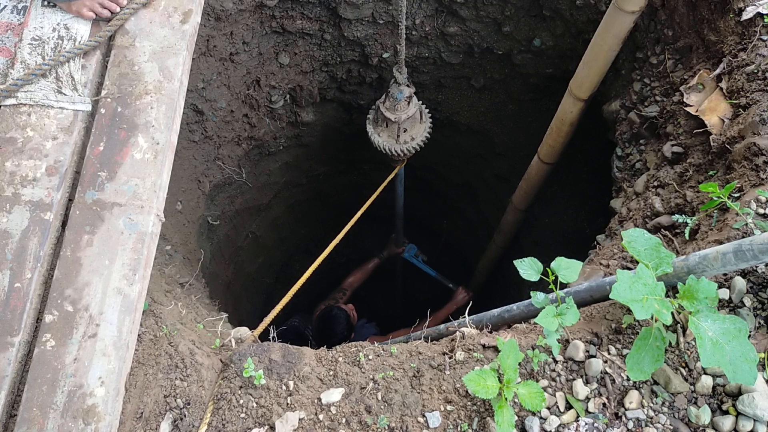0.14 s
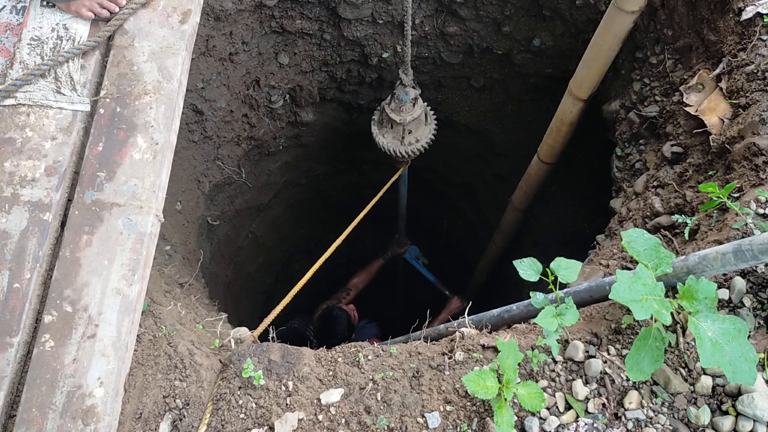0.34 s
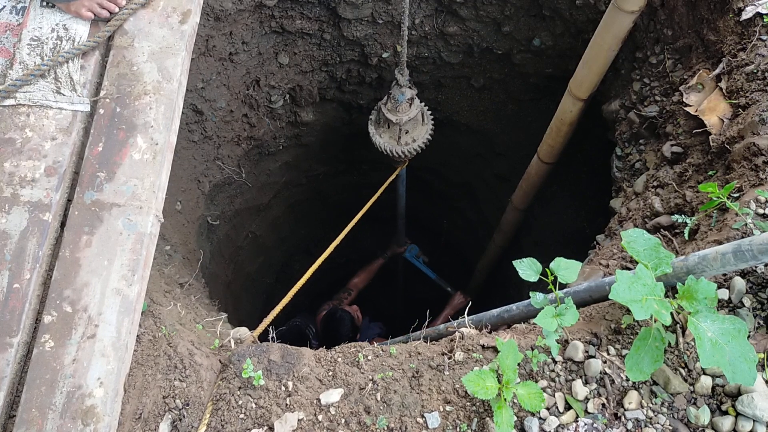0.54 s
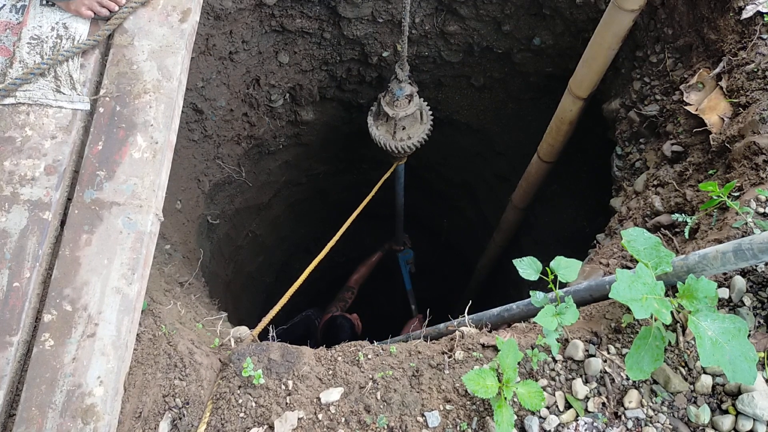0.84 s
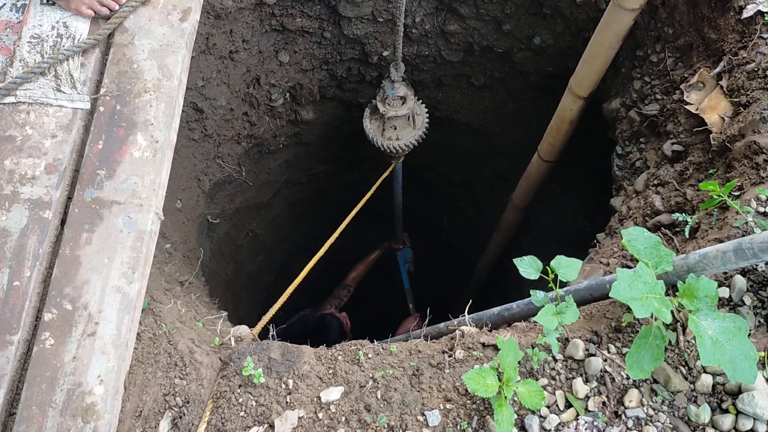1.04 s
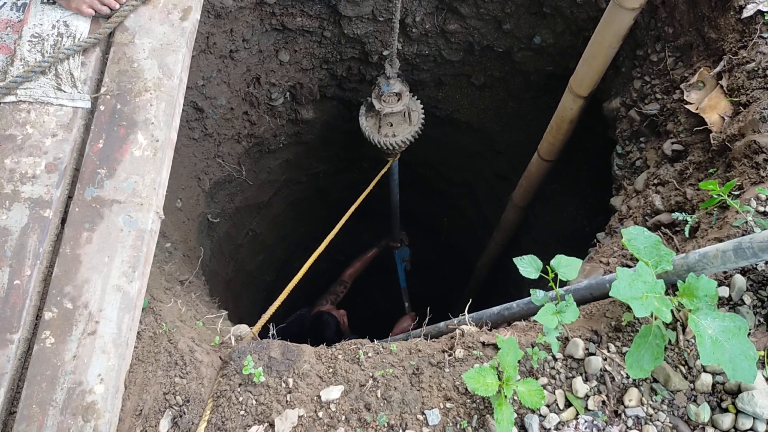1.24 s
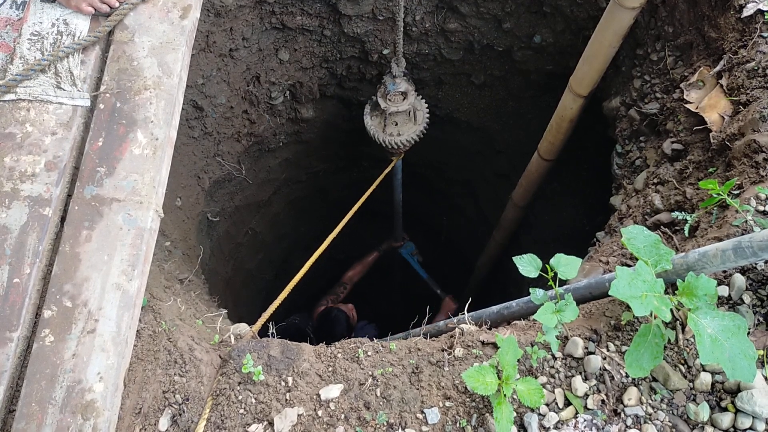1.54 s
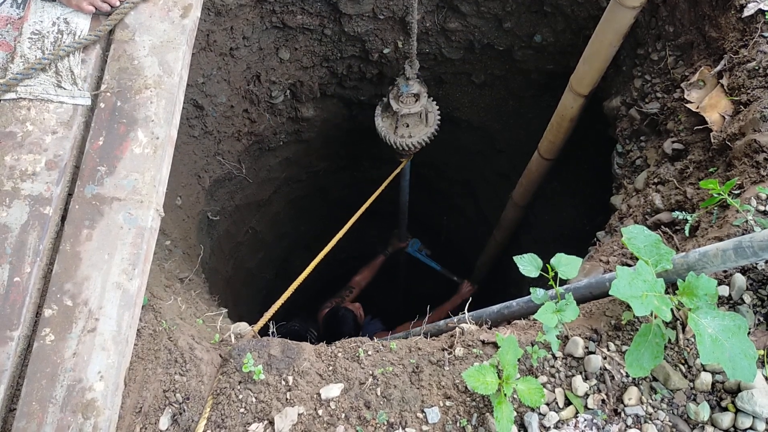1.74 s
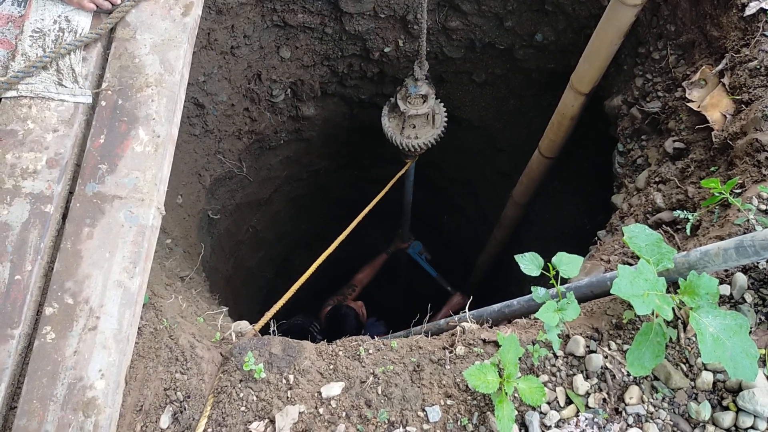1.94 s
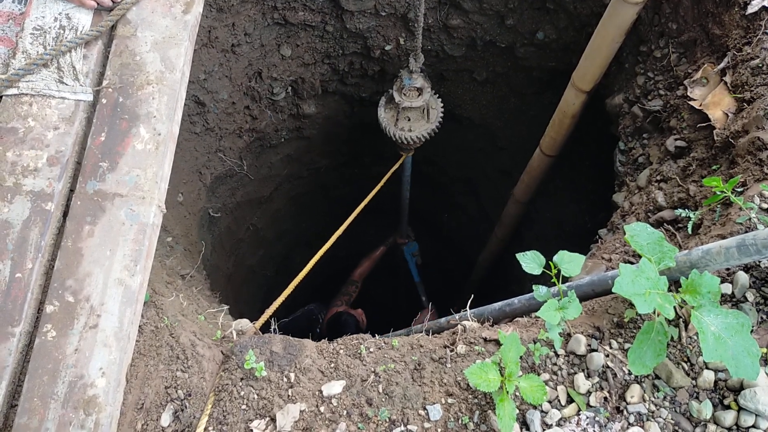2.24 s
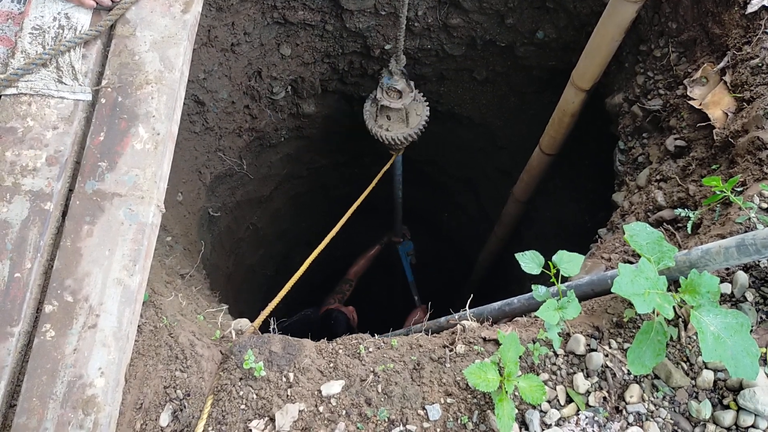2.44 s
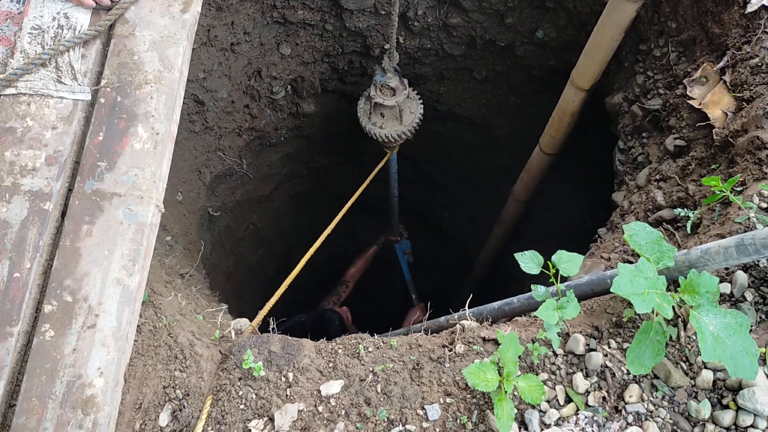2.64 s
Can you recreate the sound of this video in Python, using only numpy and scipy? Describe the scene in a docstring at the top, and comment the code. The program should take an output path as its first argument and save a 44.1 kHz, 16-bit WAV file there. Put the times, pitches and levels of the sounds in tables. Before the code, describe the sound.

Irregular ratcheting clinks of a wrench on steel pipe, densest in the first second and again around two seconds, with slight soil scuffs, faint insect hiss and low engine puffs outdoors, fairly close microphone.

```python
"""Wrench on a pipe in a pit

A wrench clanks and ratchets on a steel pipe down in an earth pit, heard from the rim.
Each blow is a short burst of rattling noise plus decaying rings of the pipe; soil scuffs and thin
scrapes come between. Far off, puffs ring the exhaust of a one-cylinder engine that changes speed.
Narrow-band noise makes insects hiss near 7.7 kHz, over a quiet outdoor floor of coloured noise."""
import sys
import numpy as np
from scipy import signal
from scipy.fft import rfft, irfft
from scipy.io import wavfile
from scipy.ndimage import uniform_filter1d

SR = 44100
rng = np.random.default_rng(int(sys.argv[2]) if len(sys.argv) > 2 else 0)


def convert_level_to_amplitude(level_db):
    """Map a level in decibels to its linear amplitude factor."""
    exponent = np.asarray(level_db, float) / 20
    return 10 ** exponent


def persist_wave(psi):
    """Save psi, clipped to +-1, as 16-bit WAV."""
    counts = np.round(np.clip(psi, -1, 1) * 32767).astype(np.int16)
    wavfile.write(sys.argv[1], SR, np.atleast_2d(counts).T)


N = 121275  # samples in the scene


def table_gain(points, hz):
    """Gain at the given frequencies, read between (Hz, dB) points on a log frequency scale."""
    p = np.array(points, float)
    return convert_level_to_amplitude(np.interp(np.log(hz + 1), np.log(p[:, 0]), p[:, 1]))


def unit(x):
    """Scale to rms 1."""
    return x / np.sqrt(np.mean(x ** 2))


def colour(x, points):
    """Filter by a (Hz, dB) spectrum without sounding early; unit gain for white noise."""
    log_gain = np.log(table_gain(points, np.arange(N // 2 + 1) * SR / N))
    # folding the cepstrum forward in time gives the minimum-phase filter
    cepstrum = irfft(log_gain, N)
    cepstrum[1:N // 2] *= 2
    cepstrum[N // 2 + 1:] = 0
    gain = np.exp(rfft(cepstrum))
    return irfft(rfft(x) * gain, N) / np.sqrt(np.mean(abs(gain) ** 2))


def band(x, hz, width):
    """Band-pass; rms 1."""
    edges = [hz - width / 2, hz + width / 2]
    return unit(signal.sosfilt(signal.butter(2, edges, "band", fs=SR, output="sos"), x))


def walk(rate):
    """Random levels held 1 / rate s and smoothed twice."""
    k = int(SR / rate)
    steps = np.repeat(rng.standard_normal(N // k + 1), k)
    return unit(uniform_filter1d(uniform_filter1d(steps, k), k)[:N])


def ring(x, hz, t60):
    """One decaying resonance driven by x."""
    r = np.exp(-np.log(1000) / (max(t60, .01) * SR))
    w = 2 * np.pi * hz / SR
    return signal.lfilter([0, r * np.sin(w)], [1, -2 * r * np.cos(w), r * r], x)


def add(out, start_s, x):
    """Mix x into out from start_s on."""
    i = max(int(start_s * SR), 0)
    out[i:i + len(x)] += x[:N - i]


def shape(t, hold, t60):
    """Envelope of a blow: quick attack, hold, exponential decay."""
    attack = 1 - np.exp(-np.maximum(t, 0) / 0.00087)
    return attack * convert_level_to_amplitude(-60 * np.maximum(t - hold, 0) / max(t60, .03))


def clang(t, hz, db, t60, turn):
    """A set of modes struck at t = 0, each a fading sine; turn is the phase in cycles."""
    fade = convert_level_to_amplitude(db[:, None] - 60 * t / np.maximum(t60, .02)[:, None])
    waves = fade * np.sin(2 * np.pi * (np.outer(hz, t) + turn[:, None]))
    return (1 - np.exp(-t / 0.0018)) * waves.sum(axis=0)


def rattle(ticks_db):
    """Dense uneven contacts of jaw on steel over a smear of their echoes, drawn as noise."""
    hits = rng.random(N) < 500 / SR  # about 500 contacts per second
    ticks = hits * convert_level_to_amplitude(1.5 * rng.standard_normal(N)) * rng.choice([-1, 1], N)
    return unit(rng.standard_normal(N) + convert_level_to_amplitude(ticks_db) * unit(ticks))


def wrench():
    """Every blow rattles the jaw and rings the steel; the rings waver a little together."""
    rings = pipe_rings() + small_rings() + singing()
    return clatter() + rings * convert_level_to_amplitude(1.5 * walk(40.12))


LEAD_S = 0.0011  # the sound of a blow starts this much before its listed time
# Blows of the wrench, levels before the layer gains: t/s, level/dB, treble/dB and top/dB relative to
# level, two loudest rings f/Hz and f/Hz, rattle hold/s, decay t60/s, lift of those rings/dB
BLOWS = [(0.009, -34.5, -20, -33, 1900, 2650, 0.0064, 0.077, 7),
         (0.076, -32.5, -23, -34, 1880, 2470, 0.0091, 0.13, 7),
         (0.145, -66, -25, -35, 1610, 2650, 0.0088, 0.14, 7),
         (0.16, -26.5, -39, -37, 1970, 2270, 0.016, 0.1, 8.3),
         (0.179, -28.5, -39, -58, 1890, 2240, 0.0074, 0.068, 13),
         (0.224, -10.5, -24, -12.5, 2150, 3170, 0.01, 0.18, 7),
         (0.286, -7.5, -25, -20.5, 1930, 2350, 0.0061, 0.22, 4.8),
         (0.411, -13.5, -25, -22, 1910, 2920, 0.018, 0.14, 9.2),
         (0.438, -13.5, -34, -34, 1880, 2640, 0.0061, 0.2, 7),
         (0.5, -13.5, -24, -25.5, 1300, 2230, 0.0087, 0.14, 5.1),
         (0.548, -5, -21.5, -19.5, 2030, 2500, 0.0069, 0.14, 7),
         (0.581, -15.5, -24, -24, 902, 2240, 0.022, 0.25, 4.6),
         (0.64, -26, -20, -28, 1850, 2240, 0.0096, 0.17, 6.2),
         (0.729, -33.5, -26, -35, 1230, 2250, 0.0063, 0.099, 16),
         (0.75, -36, -30, -28, 1960, 2260, 0.012, 0.12, 7.7),
         (0.792, -14.5, -23.5, -23.5, 1460, 2240, 0.011, 0.12, 10.4),
         (0.816, -20, -20, -34, 2050, 2360, 0.015, 0.27, 4.8),
         (0.914, -12.5, -20, -22, 1980, 2760, 0.012, 0.18, 3.7),
         (1.006, -16.5, -16.5, -23, 1980, 2230, 0.016, 0.14, 7),
         (1.038, -7, -26, -24, 1943, 2640, 0.0051, 0.25, 5.3),
         (1.132, -24.5, -23, -28, 1970, 2230, 0.014, 0.15, 14),
         (1.268, -35.5, -39, -38, 1810, 2230, 0.0083, 0.079, 14),
         (1.357, -18.5, -22, -19, 1980, 2150, 0.013, 0.15, 5.2),
         (1.415, -26, -24, -27, 1990, 2230, 0.0068, 0.14, 10.4),
         (1.553, -26.5, -45, -29, 1970, 2960, 0.017, 0.24, 13.4),
         (1.589, -36, -33, -21, 1870, 2240, 0.0093, 0.11, 16),
         (1.642, -36, -34, -25, 1870, 2220, 0.0092, 0.1, 8.9),
         (1.681, -21, -49, -36, 1880, 3530, 0.0075, 0.067, 9.8),
         (1.729, -7, -24, -19.5, 1980, 2940, 0.016, 0.13, 11.1),
         (1.795, -14, -18, -25, 1990, 2240, 0.0074, 0.12, 4.2),
         (1.817, -17, -29, -29, 1920, 2770, 0.016, 0.25, 2.8),
         (1.911, -15.5, -23, -34, 1870, 3140, 0.028, 0.27, 7.8),
         (1.975, -15.5, -26, -28, 1870, 2250, 0.036, 0.33, 6.3),
         (2.049, -21.5, -19.5, -26, 1820, 2470, 0.011, 0.16, 4.2),
         (2.099, -24.5, -18, -20, 1970, 2370, 0.0082, 0.14, 7),
         (2.149, -20.5, -22, -24, 1960, 2960, 0.013, 0.11, 11),
         (2.233, -15.5, -28, -24, 1950, 2710, 0.024, 0.17, 6.5),
         (2.256, -16.5, -23, -37, 1920, 2960, 0.013, 0.14, 10.3),
         (2.291, -31.5, -9, -26, 1890, 2240, 0.018, 0.26, 7),
         (2.336, -11.5, -22, -23, 1810, 3030, 0.012, 0.13, 3.6),
         (2.424, -16.5, -25, -18.5, 1870, 2230, 0.0061, 0.14, 9.1),
         (2.455, -21, -28, -24, 1850, 2230, 0.0066, 0.11, 10.4),
         (2.478, -25.5, -27, -29, 1980, 2240, 0.012, 0.14, 12),
         (2.568, -33, -20, -22, 1970, 2210, 0.016, 0.24, 7),
         (2.607, -37.5, -22, -20, 1440, 2360, 0.0087, 0.13, 6.4),
         (2.69, -36.5, -39, -34, 1980, 2240, 0.014, 0.091, 16),
         (2.74, -27.5, -41, -33, 1920, 2170, 0.012, 0.14, 9.8)]
# Colour of the clatter's body: f/Hz, level/dB per Hz
BODY_COLOUR = [(150, -19), (250, -26.5), (548, -19), (873, -9.5), (1490, -4.5), (1990, 0), (3520, -8),
               (4250, -14), (4600, -15), (5320, -26.5), (6000, -31.5), (7800, -12), (13200, -120)]
# Colour of the clatter's treble: f/Hz, level/dB per Hz
TREBLE_COLOUR = [(3410, -44), (5800, -22), (6430, 5), (7590, -5), (9420, -5.5), (10000, -7), (13000, -30),
                 (22000, -120)]
# Colour of the clatter's highest layer: f/Hz, level/dB per Hz
TOP_COLOUR = [(5590, -36), (9500, -9), (12800, -2.5), (14100, -3), (14900, 0.5), (16000, -22)]


def clatter():
    """Each blow gates rattling noise in three layers; treble and top start late, top fades sooner."""
    body, treble, top = np.zeros((3, N))  # power over time
    t = np.arange(SR // 3) / SR
    late = t - 0.0024
    for s, db, treble_db, top_db, _, _, hold, t60, _ in BLOWS:
        s = s - LEAD_S
        add(body, s, (convert_level_to_amplitude(db) * shape(t, hold, t60)) ** 2)
        add(treble, s, (convert_level_to_amplitude(db + treble_db) * shape(late, hold, t60)) ** 2)
        add(top, s, (convert_level_to_amplitude(db + top_db) * shape(late, hold * 0.63, t60 * 0.63)) ** 2)
    lumps = convert_level_to_amplitude(2.5 * walk(150))  # fast uneven level shared by the layers
    out = np.zeros(N)
    # layer level dB, power, colour, level of ticks against noise dB
    for db, power, points, ticks_db in ((-14.5, body, BODY_COLOUR, -6.5),
                                        (-10, treble, TREBLE_COLOUR, -4.5),
                                        (-5.5, top, TOP_COLOUR, -4.5)):
        out += convert_level_to_amplitude(db) * colour(lumps * np.sqrt(power) * rattle(ticks_db), points)
    return out


# Pitches of the pipe's modes: f/Hz
PIPE_HZ = [720, 903, 991, 1251, 1459, 1587, 1873, 1975, 2233, 2356, 2485, 2642, 2944, 3026, 3170, 3400,
           3522, 3680, 4031, 4490, 5650, 6200, 6290]
# The same modes in the same order: level/dB relative to the blow's ring level, t60/s
PIPE_MODES = [(-26, 0.54), (-9.5, 0.19), (-16.5, 0.34), (-6, 0.12), (-19.5, 0.31), (-17.5, 0.44),
              (-2.5, .18), (-0.5, 0.12), (-10.5, 0.32), (-12, 0.37), (-19.5, 0.41), (-6, 0.21), (-9, 0.12),
              (-7.5, 0.15), (-11.5, .15), (-16, 0.38), (-10.5, 0.19), (-6, 0.088), (-15.5, 0.3),
              (-11.5, 0.19), (-46, 0.6), (-20, 0.3), (-27, 0.3)]


def pipe_rings():
    """Each blow strikes the pipe's modes unevenly and lifts the two nearest its loudest rings."""
    out = np.zeros(N)
    t, hz = np.arange(SR // 3) / SR, np.array(PIPE_HZ, float)
    mode_db, mode_t60 = np.array(PIPE_MODES).T
    for s, db, _, _, low_hz, high_hz, _, _, lift_db in BLOWS:
        strike_db = 4 * rng.standard_normal(len(hz))
        loudest = [np.argmin(abs(hz - low_hz)), np.argmin(abs(hz - high_hz))]
        strike_db[loudest] = lift_db
        level_db = db - 15.5 + mode_db + strike_db
        add(out, s - LEAD_S, clang(t, hz, level_db, mode_t60, rng.random(len(hz))))
    return out


def small_rings():
    """Each blow also rings 60 small modes of its own, placed at random and coloured like the clatter."""
    out = np.zeros(N)
    t = np.arange(SR // 6) / SR
    for s, db, treble_db, *_ in BLOWS:
        place, size, length, turn = rng.random((4, 60))
        hz = 700 * 16 ** place
        tint = table_gain(BODY_COLOUR, hz) + convert_level_to_amplitude(treble_db - 9) * table_gain(TREBLE_COLOUR, hz)
        level_db = db - 22.5 + 6 * (size - .5) + 20 * np.log10(tint)
        add(out, s - LEAD_S, clang(t, hz, level_db, 0.18 * (.5 + length), turn))
    return out


# Contacts that leave one mode singing (the pipe mode nearest in pitch): t/s, level/dB, f/Hz
SINGING = [(.226, -30, 3680), (.29, -29, 4031), (.45, -35, 3522), (.812, -27, 2356), (.925, -35, 4490),
           (1.045, -25, 2642), (1.1, -47, 720), (1.683, -32, 3522), (1.731, -33, 4490), (2.29, -33, 2233),
           (2.3, -46, 720), (2.44, -45, 720)]


def singing():
    """Each contact rings a single mode of the pipe, with that mode's own decay."""
    out = np.zeros(N)
    t, hz = np.arange(SR // 3) / SR, np.array(PIPE_HZ, float)
    mode_t60 = np.array(PIPE_MODES)[:, 1]
    for s, db, sing_hz in SINGING:
        k = [np.argmin(abs(hz - sing_hz))]
        add(out, s, clang(t, hz[k], np.array([db]), mode_t60[k], rng.random(1)))
    return out


# When and how long each scuff sounds: start t/s, length/s
SCUFF_SPANS = [(1.995, .05), (2.04, .065), (1.99, .115), (1.29, .025), (.092, .025), (.09, .03),
               (1.99, .16), (2.45, .18), (.8, .12), (2.07, .04)]
# Dull scuffs in the soil, thin scrapes and a tick, in the same order:
# level/dB before the fade in and out, f/Hz, width/Hz, grit (ticks against noise)/dB
SCUFFS = [(-43.5, 245, 59, -15), (-45, 223, 73, -12), (-46.5, 360, 210, -6), (-49, 350, 210, -5),
          (-49, 15000, 2600, -6), (-58, 11200, 500, -9), (-50.5, 11000, 12000, 0),
          (-55.5, 12000, 16000, -8), (-48.5, 4500, 6300, -3), (-45, 15000, 1400, -9)]


def scuffs():
    """Short uneven bursts of gritty noise, each in one band."""
    out = np.zeros(N)
    for (s, length), (db, hz, width, grit_db) in zip(SCUFF_SPANS, SCUFFS):
        n = int(length * SR)
        grit = band(rattle(grit_db)[:SR // 2], hz, width)
        burst = unit(grit[-n:])  # the end, where the filter has settled
        add(out, s, convert_level_to_amplitude(db) * np.sqrt(np.hanning(n)) * burst)
    return out


# How the engine turns, read between rows: t/s, firings so far
CRANK = [(-.05, -1), (.03, 0), (.27, 3), (.468, 5), (.623, 7), (.914, 10), (1.061, 12), (1.226, 14),
         (1.428, 17), (1.539, 19), (1.877, 26), (2.044, 29), (2.375, 34), (2.456, 35), (2.572, 37),
         (2.779, 41)]
# How hard it works: t/s, level/dB of a firing pulse before smoothing and ringing,
# load/dB (lifts the exhaust rings above 100 Hz)
ENGINE = [(0, -48, -19), (.19, -50, -9), (.33, -63, 4), (.47, -42, -4), (.55, -52, -12), (.62, -46, -5),
          (.8, -49, -9), (.915, -41.5, -4), (.99, -49, -5), (1.06, -43, -9), (1.14, -50, -2),
          (1.23, -41, -8), (1.43, -41, -5.5), (1.6, -45, -1), (1.85, -49.5, 6), (2.05, -44.5, -0.5),
          (2.2, -44, -7), (2.37, -46, -1.5), (2.47, -41.5, 3), (2.75, -43.5, 5)]
# Resonances of the exhaust: f/Hz, level/dB as gain on the puffs, t60/s
EXHAUST = [(45, -34, 0.044), (80.6, 1, 0.087), (112.7, -2, 0.088), (221.5, -9, 0.073)]


def engine():
    """A soft puff per firing rings the exhaust; its return along the pipe and load feed the upper rings."""
    crank, (at, level, load) = np.array(CRANK), np.array(ENGINE).T
    times = np.interp(np.arange(crank[-1, 1]), crank[:, 1], crank[:, 0]) - 0.00916  # s, a little early
    firing_db = np.interp(times, at, level) + 0.5 * rng.standard_normal(len(times))
    pulses = np.zeros(N)
    pulses[(times * SR).astype(int)] = convert_level_to_amplitude(firing_db)
    puffs = uniform_filter1d(pulses, int(0.0012 * SR))
    slow_puffs = uniform_filter1d(puffs, int(0.0044 * SR))
    echoed = puffs + convert_level_to_amplitude(2.5) * np.roll(puffs, int(0.0088 * SR))  # returns after 8.8 ms
    loaded = echoed * convert_level_to_amplitude(np.interp(np.arange(N) / SR, at, load))
    out = np.zeros(N)
    for hz, db, t60 in EXHAUST:
        out += convert_level_to_amplitude(db) * ring(loaded if hz > 100 else slow_puffs, hz, t60)
    return out


def insects():
    """Narrow-band noise whose level drifts and flickers."""
    level_db = -64.5 + 1.4 * walk(3.87) + 1.2 * walk(59.94)
    return convert_level_to_amplitude(level_db) * band(rng.standard_normal(N), 7710, 580)  # centre and width, Hz


# Colour of the outdoor floor: f/Hz, level/dB per Hz
FLOOR_COLOUR = [(12, -38), (25, -10), (40, -4.5), (70, -7.5), (110, -11), (170, -14), (250, -14),
                (400, -22), (616, -23), (1020, -22), (2000, -18), (3140, -25.5), (4300, -40), (5600, -42),
                (6300, -35), (8890, -34), (15200, -34), (16500, -47)]


def outdoor_floor():
    """Soft coloured noise that swells slowly."""
    return convert_level_to_amplitude(-52 + 1.2 * walk(2.38)) * colour(rng.standard_normal(N), FLOOR_COLOUR)


def scene():
    """Wrench, scuffs, engine, insects and outdoor floor together, in one channel."""
    return (wrench() + scuffs() + engine() + insects() + outdoor_floor())[None]


def top_cut(x):
    """Nothing passes above the cut-off."""
    return signal.sosfilt(signal.butter(12, 16820, fs=SR, output="sos"), x)


def record(dry):
    """The phone cuts the top steeply above 16 kHz."""
    low_pass = signal.ellip(8, .2, 60, 16000, fs=SR, output="sos")
    mix = signal.sosfilt(low_pass, dry)
    return top_cut(mix)


dry = scene()
out = record(dry)
persist_wave(out)
```